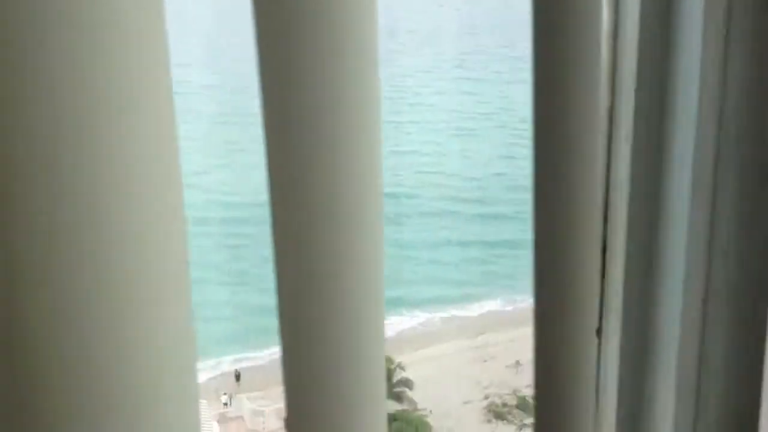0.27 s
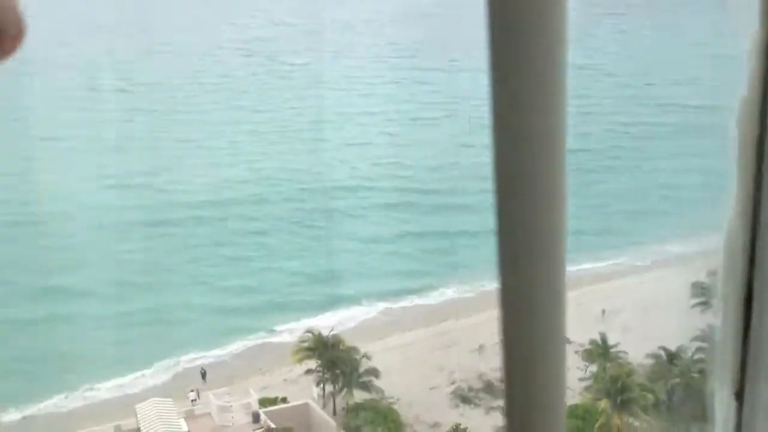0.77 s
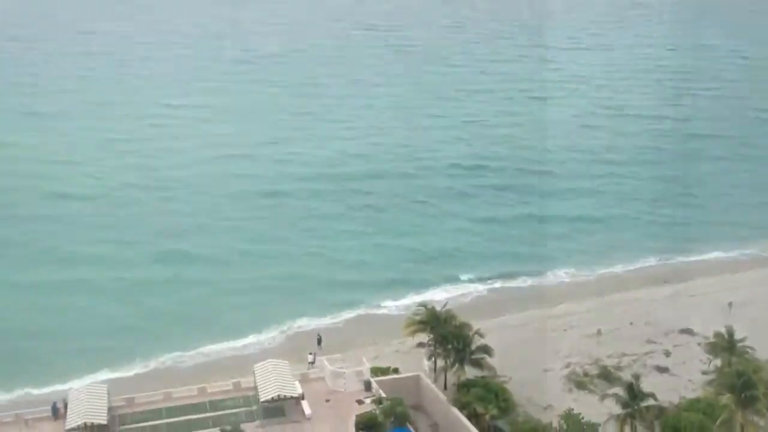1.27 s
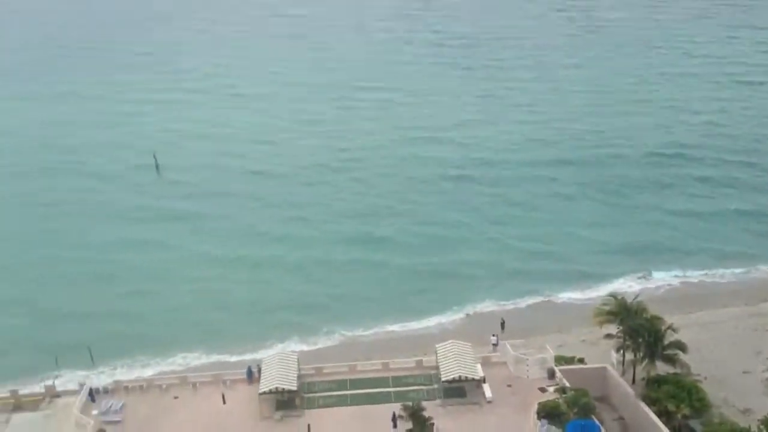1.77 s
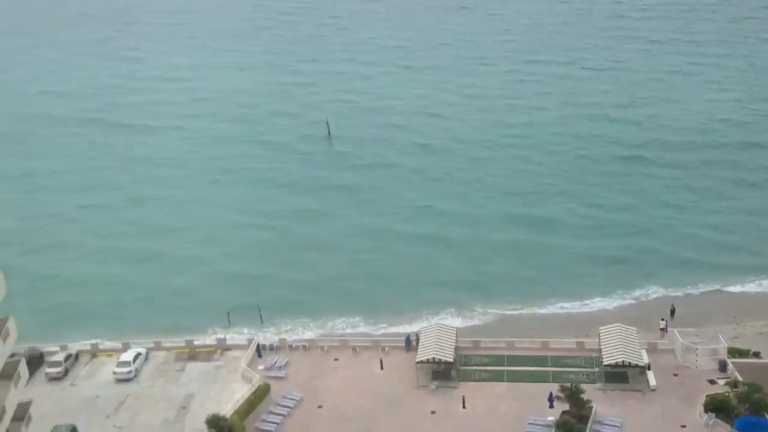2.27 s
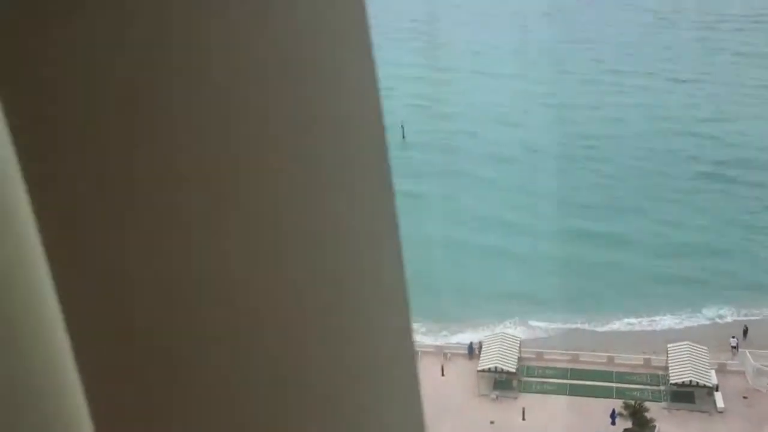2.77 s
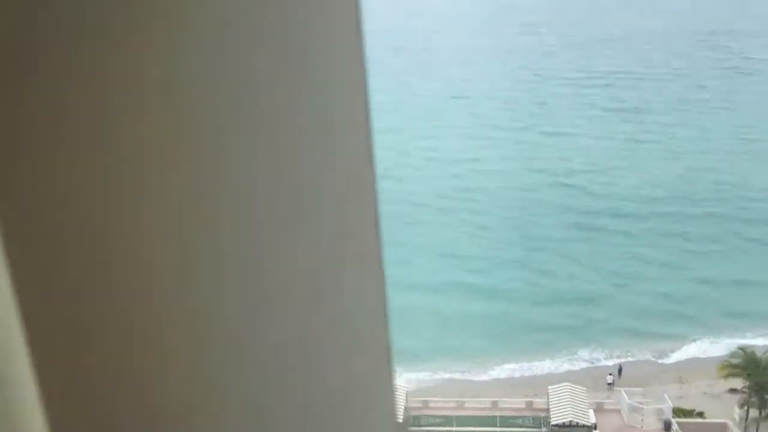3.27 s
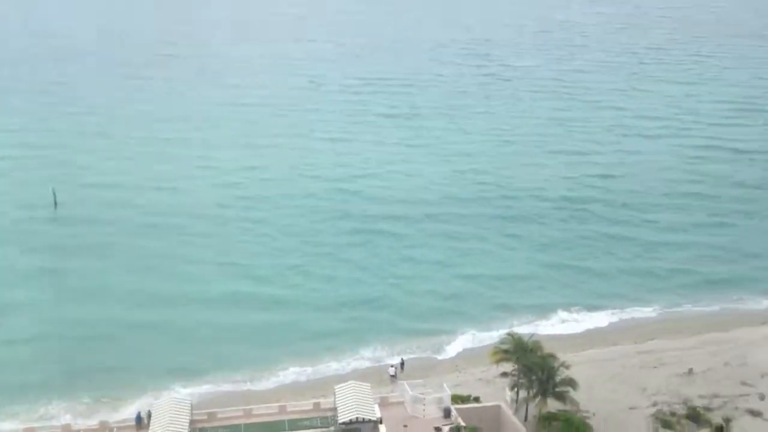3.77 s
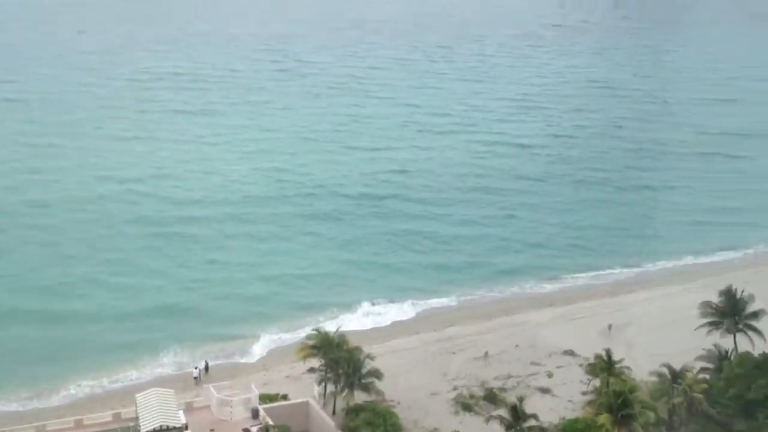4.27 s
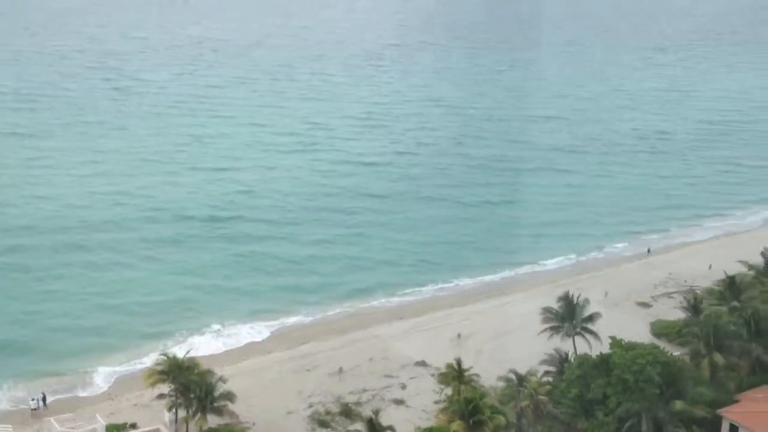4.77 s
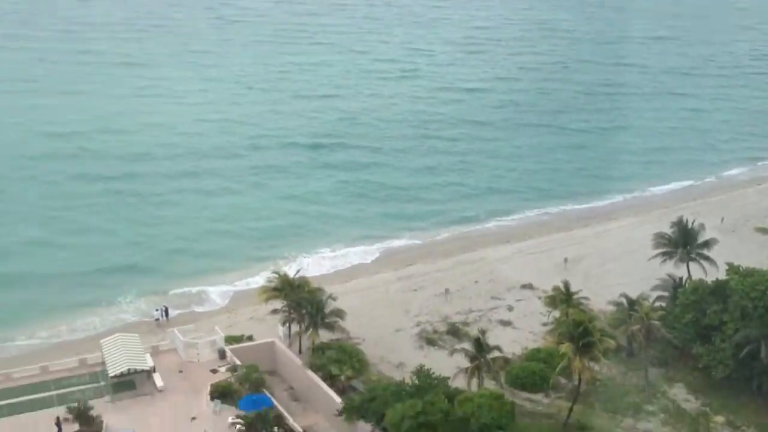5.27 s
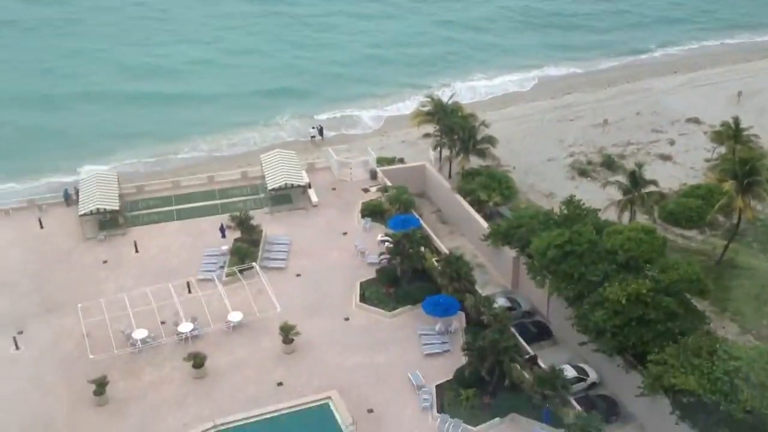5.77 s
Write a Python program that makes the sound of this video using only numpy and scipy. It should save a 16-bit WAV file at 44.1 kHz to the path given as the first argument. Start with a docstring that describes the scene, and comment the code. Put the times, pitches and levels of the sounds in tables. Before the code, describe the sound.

In a quiet room with faint ventilation rumble, light blind slats click together, thud sharply against glass, scrape, rattle in a flurry and fade.

```python
"""Blind slats at a closed window

Plastic vertical slats are pushed aside by hand in a quiet room. They tick against each other and twice
knock hard on the pane: impacts that ring damped modes. They slide with a dry rustle and short scrapes:
stick-slip noise through bands and resonances. Soft low bumps and frame booms are enveloped sines.
Under it lies a ventilation rumble, band-shaped noise, with a mains hum."""
import sys
import numpy as np
from scipy import signal
from scipy.fft import rfft, irfft, next_fast_len
from scipy.io import wavfile

SR = 44100
rng = np.random.default_rng(int(sys.argv[2]) if len(sys.argv) > 2 else 0)


def output_pcm(signal):
    """Save a mono or channel-first signal as 16-bit PCM at the path in sys.argv[1].

    Samples are clipped to [-1, 1] before scaling.
    """
    pcm = np.clip(np.atleast_2d(signal).T, -1, 1) * 32767
    wavfile.write(sys.argv[1], SR, np.round(pcm).astype(np.int16))


def invert_db(x):
    """Field ratio 10**(x/20) for x, a level in decibels (scalar or array-like)."""
    u = np.asarray(x, float) / 20
    return 10 ** u


N = 264644
TIME_S = np.arange(N) / SR

# loud and faint ticks of the slats, with short humming or rattling tones and low after-rings:
# (time [s], peak level [dB], favoured pitch [Hz], tilt above that pitch [dB per octave], chatter decay [ms])
TICK_BLOWS = [(0.3733, -39, 450, 18, 4.2), (0.639, -43.5, 2730, -18, 22), (0.7615, -28, 710, 0, 3.4),
              (0.764, -40, 616, -8, 4), (0.875, -28.5, 2680, -7.5, 11.5), (0.8775, -42.5, 673, -26, 6),
              (0.8785, -28, 5100, -10, 4.1), (0.8875, -35, 5030, 6, 20), (0.956, -28, 6160, 20, 3.7),
              (1.0387, -38, 3840, 9, 1.0), (1.1096, -33.5, 4830, 11, 5), (1.1509, -34.5, 6950, 17, 1.6),
              (1.2351, -23, 5100, 15, 1.5), (1.2387, -39, 7500, 0, 10), (1.2588, -15, 1810, -0.5, 5.1),
              (1.26, -33, 500, -4.5, 3), (1.304, -36, 1860, -7, 6.8), (1.308, -36, 2400, -18, 15),
              (1.3455, -32, 7600, -4, 14), (1.3507, -33, 7400, 7, 2.2), (1.3875, -40, 6940, 0, 1.2),
              (1.3936, -41, 7000, 0, 5.4), (1.4271, -28.5, 3630, -6, 6.2), (1.4926, -22.5, 1610, -3, 5.1),
              (1.494, -52, 670, -18, 3.1), (1.5061, -29.5, 1830, -3.5, 6.6), (1.523, -24.5, 5200, 8, 1.3),
              (1.528, -33.5, 4240, 7, 28), (1.74, -31, 3450, -3.5, 3.9), (1.787, -38, 1930, -1, 11),
              (2.306, -36.0, 5500, 0, 2.2), (2.427, -34.5, 5960, 25, 18), (2.7563, -22.5, 1257, -12, 1.6),
              (2.8026, -35.5, 1900, -16, 13), (3.0625, -29, 5300, 1, 19), (3.2613, -32.5, 1780, 4, 14.0),
              (3.3308, -19, 4550, -2.5, 5.4), (3.4463, -38.5, 3920, 14, 7), (3.4598, -34, 798, -7, 8),
              (3.4732, -20.5, 985, -0.5, 6.3), (3.4985, -30, 1600, -4, 3.7), (3.5127, -26, 697, -3, 8.7),
              (3.5234, -35.5, 718, -11, 7.3), (3.533, -38, 700, -14, 4.2), (3.5935, -40, 683, -20, 5),
              (3.5953, -26.5, 1510, 3, 6.3), (3.599, -32, 2240, -24, 12), (3.612, -35, 727, -15, 18),
              (3.645, -31, 1830, 3, 1.2), (3.668, -40, 764, -17, 23), (3.7305, -36.5, 910, -9, 2.8),
              (3.734, -38, 487, -27, 16), (3.765, -32.5, 4300, -7, 12), (3.768, -31, 970, -10, 14),
              (3.802, -26, 2420, -4, 16), (3.8188, -20.5, 710, 6.5, 5.6), (3.8252, -20.5, 1224, -7, 8.2),
              (3.8756, -27, 7100, -12, 6.3), (3.8862, -29.5, 2700, -3, 14.0),
              (3.9007, -24, 1410, -10.5, 1.5), (3.9426, -32, 1340, 2, 18), (3.952, -36, 2450, -16, 25),
              (3.9898, -27, 2330, -12, 15), (4.033, -23.5, 2900, -4, 7.1), (4.039, -19, 1930, -3.5, 6.5),
              (4.0853, -35, 6430, 6, 4), (4.136, -31, 4530, -5, 0.72), (4.142, -44, 5000, -9, 9.4),
              (4.191, -41, 4020, 1, 6.3), (4.233, -46, 2800, -3, 6.9), (4.25, -39.5, 3000, -5, 1.4),
              (4.2599, -41, 1760, -3, 1.9), (4.33, -45, 2470, -14, 20), (4.3497, -37, 4900, -18, 4.2),
              (4.388, -44.5, 2480, -12, 15), (4.415, -45, 2450, -12, 20), (4.4514, -46, 4440, -3, 2.1),
              (4.5166, -49, 3500, -7, 6.9), (4.7217, -39.5, 3000, -1.5, 5), (4.8107, -53, 4900, 7, 12),
              (4.87, -50, 3000, -4, 18), (4.8807, -44, 3480, -7, 1.5), (4.9373, -49, 6000, 0, 7.8),
              (5.0246, -47.5, 3000, -1, 1.8), (5.8072, -48, 706, -4.5, 7.1)]
# loud and faint blows of slat on pane: (time [s], peak level before the treble cut [dB], chatter decay [ms],
# share of the free ring time left while the slat rests on the glass [0-1], tilt [dB per octave])
PANE_BLOWS = [(2.5735, -7.5, 4.8, 0.59, 3.5), (2.579, -11.5, 3.3, 0.5, 6.5), (2.583, -14, 4.1, 0.6, 2.5),
              (2.591, -16.5, 4, 0.35, -0.5), (2.595, -20.5, 2.6, 0.8, 6), (2.602, -31, 7.3, 0.6, 5),
              (2.6385, -10, 1.0, 0.56, -3.5), (2.647, -15, 5.6, 0.43, -2), (2.657, -24.5, 4, 0.65, -5),
              (2.668, -33, 6.7, 0.9, 9), (2.686, -29.5, 11, 0.65, -2.5), (3.47, -31, 13, 0.48, -3),
              (3.513, -36.5, 60, 0.2, -13.5), (3.613, -33.5, 6.4, 0.21, -9), (3.656, -43.5, 11, 0.8, -21),
              (3.733, -47, 8.3, 0.6, -14), (3.819, -27, 2.3, 0.17, -9.5), (3.9, -37, 6.7, 0.24, -16),
              (3.962, -41, 10, 0.7, -18), (4.038, -36, 3, 0.21, -15)]
# vibration modes of a slat: (frequency [Hz], level [dB])
SLAT_MODES = [(480, -10.5), (690, -0.5), (815, 0.5), (1000, -5.5), (1300, -2), (1580, 2), (1780, 7),
              (2220, 8), (2680, 10.5), (3150, 5), (3750, 11), (4550, 12.5), (5150, 10.5), (6100, 0.5),
              (6950, 12.5), (7600, 10), (8800, 0.5), (10500, -19), (12500, -4.5), (14500, -50)]


def rms_one(x):
    """Normalises the mean power: scales to unit rms."""
    return x / np.sqrt(np.mean(x ** 2) + 1e-20)


def drift(rate_hz):
    """Slow random fluctuation: noise through a double one-pole low-pass, spread 1."""
    pole = np.exp(-80 * np.pi * rate_hz / SR)    # one step lasts 40 samples
    noise = rng.standard_normal(N // 40 + 2002)
    slow = signal.lfilter([1], [1, -2 * pole, pole * pole], noise)[2000:]
    return np.interp(np.arange(N) / 40, np.arange(len(slow)), rms_one(slow))


def coloured(source, spectrum, patchy_db, flicker_hz):
    """Spectral shaping in third octaves, alternately from two signals, each band flickering; rms 1."""
    hz, level_db = np.transpose(spectrum)
    edges = 25 * 2 ** np.arange(0, 9.5, 1 / 3)
    out = 0
    for k, (low, high) in enumerate(zip(edges, edges[1:])):
        band_pass = signal.butter(2, [low, high], "band", fs=SR, output="sos")
        band = signal.sosfilt(band_pass, source[k % 2])
        gain_db = np.interp(np.log(low * high) / 2, np.log(hz), level_db)
        out = out + band * invert_db(gain_db + patchy_db * drift(flicker_hz))
    return rms_one(out)


def slat_modes():
    """Mode splitting: a long slat has close neighbours at each mode; plastic damps all in a few cycles."""
    ring_cycles = 22    # to -60 dB
    hz, level_db = np.repeat(SLAT_MODES, 3, axis=0).T
    return hz, level_db, ring_cycles / hz


def add_blow(out, start_s, peak_db, modes, chatter_ms, scatter_db, detune, crack_db):
    """Modal impact: a first contact and a dying chatter of smaller ones excite decaying modes."""
    hz, level_db, t60 = np.transpose(modes)[:, :, None]
    t = np.arange(int(min(t60.max(), 1) * SR) + 64) / SR
    luck = rng.standard_normal((2, len(modes), 1))
    signs = (-1.) ** np.arange(len(modes))[:, None]    # every other mode starts with opposite sign
    gains = signs * invert_db(level_db + scatter_db * luck[1])
    tones = np.sin(2 * np.pi * hz * (1 + detune * luck[0]) * t)
    ring = np.sum(gains * invert_db(-60 * t / t60) * tones, axis=0)

    u = np.arange(SR // 10) / SR
    contacts = rng.standard_normal(len(u)) * (rng.random(len(u)) < .05)
    contacts *= np.exp(-1000 * u / max(chatter_ms, .1))
    # small hard contacts barely move the low modes
    contacts = invert_db(5.5) * signal.lfilter([1, -.88], [1], contacts)
    contacts[0] = 2.8

    i = round(start_s * SR)
    blow = signal.fftconvolve(ring, contacts)[:N - i]
    crack = np.array([0.81, -1.55, -0.63, -0.58])    # the sharp edge of the first contact
    blow[1:5] += invert_db(crack_db) * np.abs(blow).max() * crack
    out[i:i + len(blow)] += invert_db(peak_db) * blow / np.abs(blow).max()


def ventilation():
    """Broadband flow noise: a steady air rumble, with the tonal hum of a motor at twice the mains."""
    # air spectrum: (frequency [Hz], relative density [dB per Hz])
    rumble = [(15, -65), (25, -24), (59, -27), (92, -17.5), (130, 2), (242, -1.5), (451, -9.5), (800, -12),
              (1230, -12.5), (1520, -21.5), (2110, -21), (3920, -26.5), (7110, -28.5), (10100, -38.5),
              (14400, -31), (18000, -32)]
    rumble_db, hum_hz, hum_db = -57, 120.3, -61.5
    air = coloured(rng.standard_normal((2, N)), rumble, patchy_db=-1.5, flicker_hz=0.43)
    hum = np.sin(2 * np.pi * hum_hz * TIME_S) * invert_db(hum_db + 1.5 * drift(3.0))
    return invert_db(rumble_db) * air + hum


def dying_rub(start_s, level_db, fade_s):
    """Exponential relaxation: the rubbing that a blow leaves behind, as an envelope."""
    return invert_db(level_db) * np.exp(-np.abs(TIME_S - start_s) / fade_s) * (TIME_S >= start_s)


def scrape_strokes():
    """Friction under load: a scrape grows as the edges press harder, then lets go."""
    # strokes of edge on edge: (time [s], length [s], level at the end [dB],
    # broadside share relative to the stroke [dB])
    scrapes = [(0.363, 0.035, -62, 3), (0.535, .11, -75.5, 15.5), (1.747, 0.13, -63, 0),
               (2.028, 0.048, -70, 12), (2.124, 0.071, -55.5, 0), (2.168, 0.1184, -41, -15),
               (2.424, 0.049, -54, -25), (2.915, 0.12, -53, -37.5), (3.008, 0.059, -44, -5.5),
               (3.062, 0.032, -44, -33), (3.257, 0.022, -44, -19), (3.317, 0.033, -47, -25),
               (3.486, 0.033, -41, -8), (3.592, 0.02, -37.5, -38), (3.658, 0.027, -55.5, 11),
               (3.874, 0.038, -61, 9.5), (3.943, 0.086, -62, 19.5), (4.006, 0.068, -73, -4),
               (4.16, 0.11, -70, -4), (4.329, 0.15, -67, 6), (4.85, 0.054, -70.5, 7),
               (4.925, 0.08, -69.5, 1), (5.508, 0.06, -66.5, -13)]
    head_start_s, swell_power = 0.03, 1.05
    scraping, broadside = 0, 0
    for start, length, last_db, broadside_db in scrapes:
        end = start + length
        swell = np.interp(TIME_S, [start - head_start_s, end], [0, 1]) ** swell_power
        release = np.exp(-np.maximum(TIME_S - end, 0) / (.003 + .03 * length))
        stroke = invert_db(last_db) * (TIME_S >= start) * swell * release
        scraping += stroke
        broadside += invert_db(broadside_db) * stroke
    return scraping, broadside


def edge_singing(grains):
    """Resonant friction: a scraped edge sings in narrow bands whose levels wander; rms 1."""
    # bands: (frequency [Hz], level [dB])
    bands = [(1000, -21), (1900, -21), (2600, 1), (3050, 3.5), (4200, -3), (5100, 2), (6200, 2.5),
             (7700, 1), (8600, -13.5)]
    sharpness, wander_db = 22, 3.5
    song = 0
    for hz, level_db in bands:
        band = signal.lfilter(*signal.iirpeak(hz, sharpness, SR), grains)
        song = song + invert_db(level_db + wander_db * drift(6)) * band
    return rms_one(song)


def slat_hums(grains):
    """Forced resonance: grains hum in the low and middle slat modes, tiny ticks patter; each rms 1."""
    patter_per_s = 300
    taps = (rng.random(N) < patter_per_s / SR) * rng.standard_normal(N) + 1e-18
    hums = []
    for hz, level_db in SLAT_MODES:
        resonance = signal.lfilter(*signal.iirpeak(hz, 9, SR), [grains, taps])
        hums.append(invert_db(level_db + 2.5 * drift(10)) * resonance)
    body = rms_one(sum(hums[:5])[0])
    middle = rms_one(sum(hums[5:10])[0])
    patter = rms_one(sum(hums[5:])[1])
    return body, middle, patter


def slide():
    """Stick-slip friction: dense random grains colour the rustle and set slat modes humming."""
    # sliding: (time [s], rustle level [dB], low body level [dB])
    sliding = [(0.0, -73.5, -67), (0.68, -67, -63.5), (0.93, -65, -61.5), (1.08, -54.5, -70),
               (1.4, -55, -61.5), (1.87, -61.5, -68), (2.09, -61, -64.5), (2.44, -59.5, -81),
               (2.65, -68.5, -55), (3.12, -64.5, -71), (3.31, -52.5, -55), (3.43, -59.5, -61.5),
               (3.66, -63, -53), (3.88, -50.5, -44.5), (4.031, -53.5, -48), (4.09, -55.5, -61.5),
               (4.55, -71, -68.5), (5.75, -77, -74), (6.0, -61.5, -57)]
    # rustle spectrum: (frequency [Hz], relative density [dB per Hz])
    rustle_spectrum = [(710, -2.5), (1200, 2), (2270, 4.5), (2450, -6.5), (3320, 6), (7600, 2.5),
                       (10000, -14.5), (14400, -3.5), (18000, -14)]
    patter_db, edge_db = -9, -1
    flutter_db, flutter_hz = 2.5, 70
    tick_rub_db, tick_rub_span = -24, 1.6    # below the tick's peak; span in chatter lengths
    knock_rub_db, knock_rub_s, knock_rub_cut_hz = -25, 0.024, 2500

    s, rustle_db, body_db = np.transpose(sliding)
    force = invert_db(np.interp(TIME_S, s, rustle_db))
    scraping, face_rub = scrape_strokes()
    broadside = invert_db(-20.0) * force + face_rub    # face-to-face rubbing drives the middle modes
    for start, peak_db, *_, chatter_ms in TICK_BLOWS:    # each tick leaves the slats rubbing
        fade_s = tick_rub_span * max(chatter_ms, .5) / 1000
        force += dying_rub(start, peak_db + tick_rub_db, fade_s)
    shaken = 0
    for start, peak_db, *_ in PANE_BLOWS:    # a knock shakes the neighbouring slats
        shaken += dying_rub(start, peak_db + knock_rub_db, knock_rub_s)

    grains = rng.standard_normal((2, N)) * invert_db(1.6 * np.minimum(rng.exponential(1, N), 5))
    grains *= invert_db(1.6 * drift(50))
    rustle = coloured(grains, rustle_spectrum, patchy_db=3.5, flicker_hz=16.0)
    flutter = invert_db(flutter_db * drift(flutter_hz))
    scrape = flutter * (invert_db(-1.0) * rustle + invert_db(edge_db) * edge_singing(grains[1]))
    dull = signal.sosfilt(signal.butter(1, knock_rub_cut_hz, fs=SR, output="sos"), rustle)
    body, middle, patter = slat_hums(grains[0])

    rubbing = force * (rustle + invert_db(patter_db) * patter)
    low_body = invert_db(np.interp(TIME_S, s, body_db)) * body
    return rubbing + scraping * scrape + shaken * dull + broadside * middle + low_body


def bumps():
    """Windowed tone bursts: a few cycles of a low tone swell and fade, perhaps the hand on the frame."""
    # bumps: (time [s], peak level [dB], pitch [Hz])
    soft_bumps = [(0.19, -41, 260), (0.241, -47, 199), (3.552, -40, 222)]
    cycles = 2.74
    out = 0
    for start, peak_db, hz in soft_bumps:
        t = TIME_S - start
        swell = np.sin(np.pi * np.clip(t * hz / cycles, 0, 1)) ** 2
        out = out + invert_db(peak_db) * np.sin(2 * np.pi * hz * t) * swell
    return out


def ticks():
    """Position-dependent excitation: each tick favours modes near its pitch, by where the slats meet."""
    below_pitch_db = 3    # fall per octave of the modes under the pitch
    dry_above_hz, dry_db = 2600, 7.0    # a higher tick loses this much of its pitch per octave
    own_db, own_cycles = 1.5, 36.7    # the struck span rings above its neighbours and longer
    dull_tone = 0.35    # dB of own pitch gained per dB of downward tilt
    crack_db = -4
    out = np.zeros(N)
    hz, level_db, t60 = slat_modes()
    detune = np.append(np.full(len(hz), .064), .005)[:, None]    # the own pitch, last, strays least
    for start, peak_db, pitch_hz, tilt_db, chatter_ms in TICK_BLOWS:
        octaves = np.log2(hz / pitch_hz)
        dry_loss_db = dry_db * max(np.log2(pitch_hz / dry_above_hz), 0)
        favour_db = max(5 - dry_loss_db, 0) * np.exp(-(octaves / .22) ** 2)
        slope_db = np.where(octaves > 0, tilt_db, below_pitch_db) * octaves
        mode_db = level_db + favour_db + slope_db
        downward_db = min(tilt_db, 0)    # a dull tick also has a softer edge
        own_level_db = np.interp(pitch_hz, hz, mode_db) + own_db - dry_loss_db - dull_tone * downward_db
        own = [pitch_hz, own_level_db, own_cycles / pitch_hz]
        modes = np.vstack([np.transpose([hz, mode_db, t60]), own])
        add_blow(out, start, peak_db, modes, chatter_ms, scatter_db=3.0, detune=detune,
                 crack_db=crack_db + downward_db)
    return out


def knocks():
    """Joint modal ringing of pane and slat: each contact tilts the modes to the high or the low side."""
    # window pane and frame modes: (frequency [Hz], level [dB], free decay time to -60 dB [s])
    pane = [(156.3, -21.5, 0.32), (233, -17, 0.07), (252, -43, 0.017), (325, -3.5, 0.13), (359, -7.5, 0.28),
            (400, -4.5, 0.065), (421, -3, 0.09), (500, -31, 0.015), (570, 1.5, 0.04), (653, 11, 0.065),
            (700, 12.5, 0.062), (835, -0.5, 0.08), (940, 3, 0.098), (1117, 8, 0.015), (1210, -3.5, 0.21),
            (1340, 4, 0.015), (1650, -8, 0.18), (1610, 8, 0.017), (1760, 13, 0.011), (1930, 0, 0.062),
            (2100, -2, 0.042), (2232, 1, 0.061), (2515, -7, 0.18), (2690, 5, 0.017), (2800, 3, 0.032),
            (3000, 1, 0.014), (3210, -6, 0.042), (3340, 0.5, 0.014), (3830, -2.5, 0.013),
            (4440, -15, 0.019), (4900, -15, 0.013), (5500, -25, 0.011)]
    slat_on_pane_db, crack_db = -15, -18
    out = np.zeros(N)
    slat = np.array(slat_modes())[:, 27:]    # the pane drowns the slat's lower modes
    slat = slat + [[0], [slat_on_pane_db], [0]]
    hz, level_db, t60 = np.hstack([np.transpose(pane), slat])
    detune = np.where(np.arange(len(hz)) < len(pane), .012, .05)[:, None]
    for start, peak_db, chatter_ms, free, tilt_db in PANE_BLOWS:
        ring_s = t60 * np.clip(free, .1, 1)
        modes = np.transpose([hz, level_db + tilt_db * np.log2(hz / 700), ring_s])
        add_blow(out, start, peak_db, modes, chatter_ms, scatter_db=3.0, detune=detune,
                 crack_db=crack_db + 2 * tilt_db)
    # the knocks, loud and faint, are all softened in the treble
    return signal.sosfilt(signal.butter(2, 4500, fs=SR, output="sos"), out)


def booms():
    """Resonant build-up: heavy blows set the frame's lowest mode growing over a cycle or two, then ringing."""
    # booms: (time [s], level from which the decay starts [dB])
    frame_booms = [(2.575, -40.5), (2.640, -39.5), (3.82, -52)]
    boom_hz, rise_s, t60_s = 153.4, 0.0098, 0.8
    out = 0
    for start, level_db in frame_booms:
        t = np.maximum(TIME_S - start, 0)
        envelope = invert_db(level_db - 60 * t / t60_s) * (1 - np.exp(-t / rise_s))
        out = out + envelope * np.sin(2 * np.pi * boom_hz * t)
    return out


def room(x):
    """Reverberation by recirculation: eighteen feedback delays, duller on every round."""
    t60_s, wall_cut_hz = 0.23, 5100    # decay of the lows; the wall low-pass shortens the treble
    size = next_fast_len(N + SR)
    w = 2 * np.pi * np.arange(size // 2 + 1) / size
    wall = 1 / (1 + 1j * w * SR / (2 * np.pi * wall_cut_hz))
    echo = 0
    for k, lag in enumerate(rng.uniform(0.0044, 0.032, size=18) * SR):
        loop = invert_db(-60 * lag / SR / t60_s) * wall * np.exp(-1j * w * lag)
        echo = echo + (-1) ** k * loop / (1 - loop)
    return irfft(rfft(x, size) * echo, size)[:N] / 3


def scene():
    """Superposition: blind sounds, which radiate no deep bass, with their room, over the ventilation."""
    room_db = -12
    sources = slide() + bumps() + ticks() + knocks() + booms()
    blind = signal.sosfilt(signal.butter(4, 120, "high", fs=SR, output="sos"), sources)
    return (blind + invert_db(room_db) * room(blind) + ventilation())[None]


def roll_off(x):
    """The treble ends steeply here."""
    return signal.sosfilt(signal.butter(12, 16470, fs=SR, output="sos"), x)


def record(dry):
    """Band limiting: a steep elliptic low-pass removes the top treble."""
    cutoff_hz = 15250
    low_pass = signal.ellip(10, 1, 35, cutoff_hz, fs=SR, output="sos")
    mix = signal.sosfilt(low_pass, dry)
    return roll_off(mix)


dry = scene()
out = record(dry)
output_pcm(out)
```